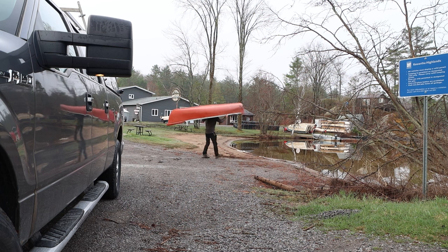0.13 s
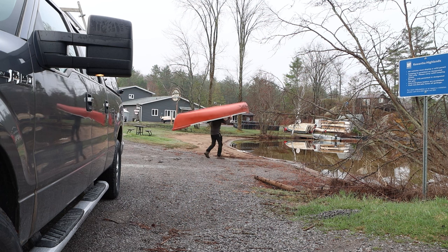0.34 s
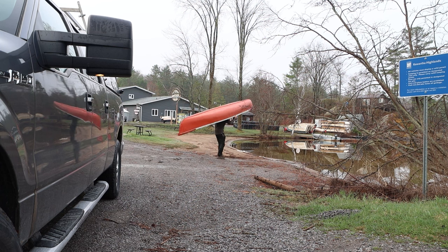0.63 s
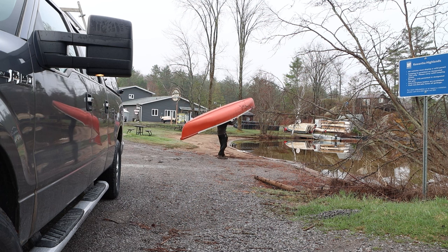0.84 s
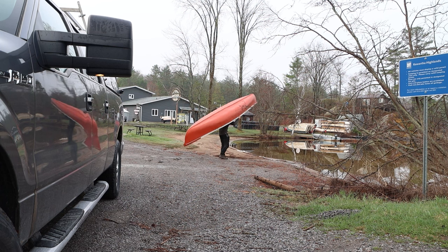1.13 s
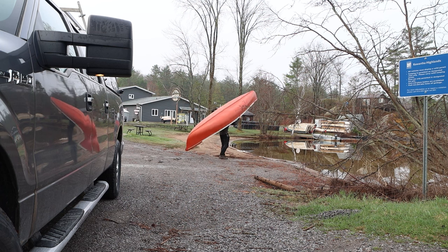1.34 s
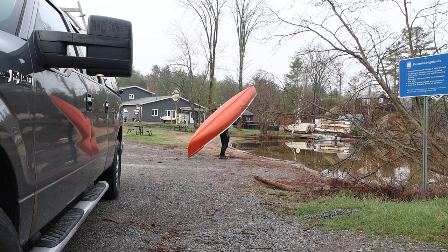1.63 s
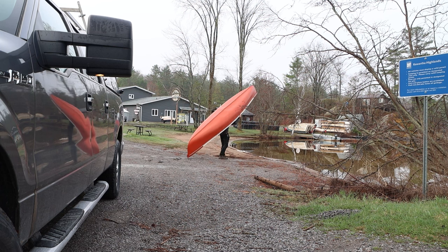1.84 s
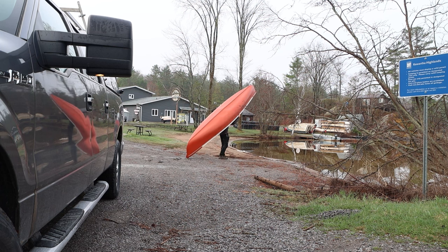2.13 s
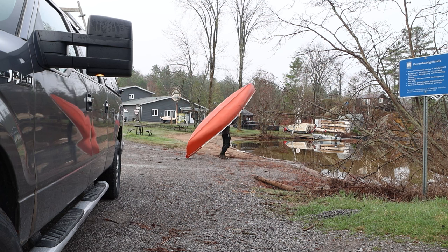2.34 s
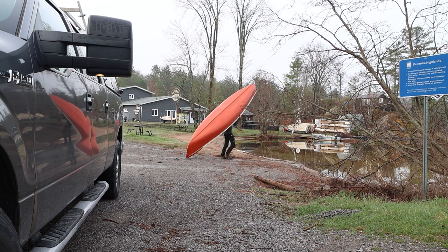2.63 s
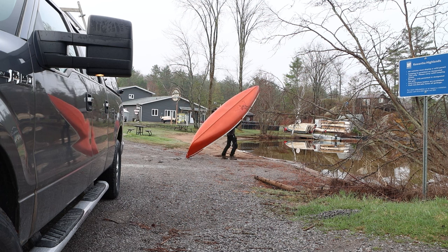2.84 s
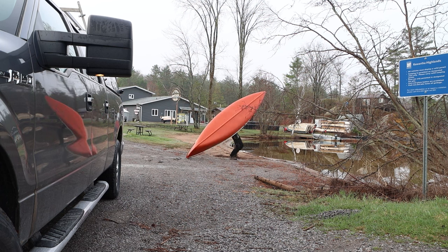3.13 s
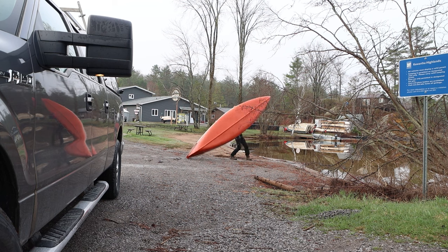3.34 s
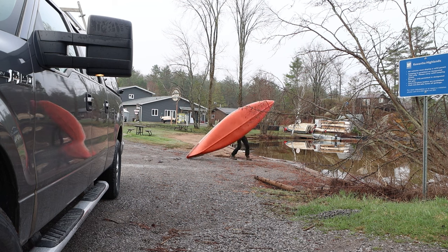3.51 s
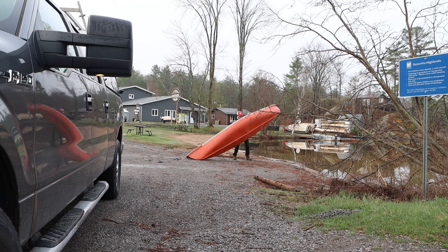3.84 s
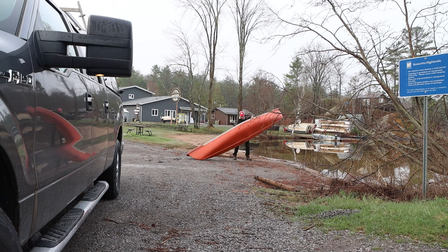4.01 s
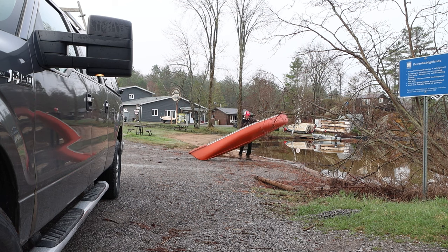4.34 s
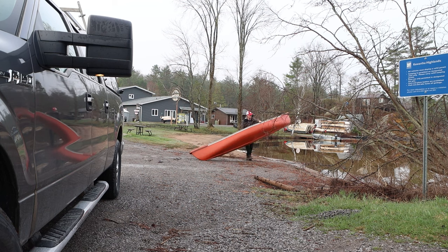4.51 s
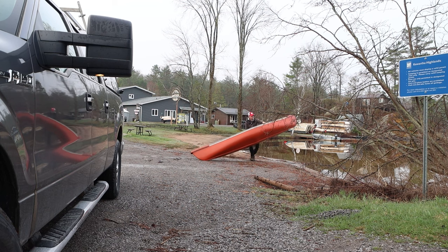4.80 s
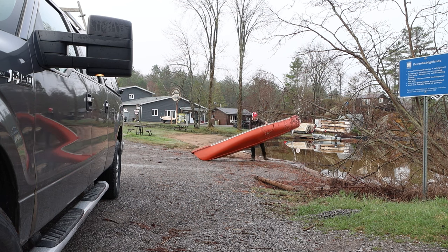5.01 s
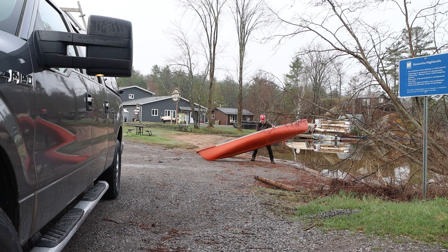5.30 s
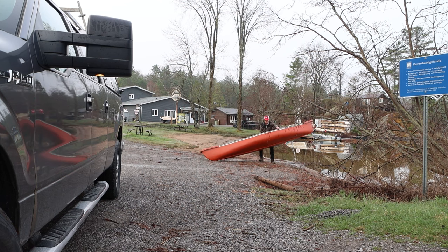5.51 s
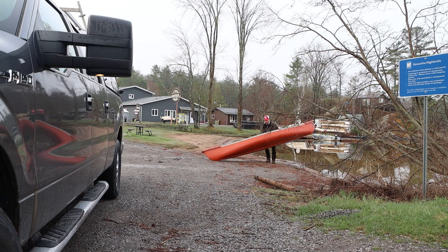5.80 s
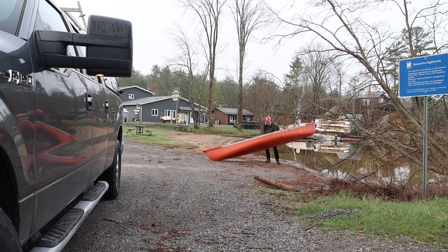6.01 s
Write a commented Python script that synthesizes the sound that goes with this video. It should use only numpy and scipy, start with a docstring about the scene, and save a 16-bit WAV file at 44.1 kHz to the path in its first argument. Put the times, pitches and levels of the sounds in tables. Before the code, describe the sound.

A person carries, tips and drags a hollow plastic canoe over gravel by still water. Footsteps and stiff fabric come first, then clattering low thuds, a bright crack, lighter bumps and steps, another burst of stony clacks, and rasping, droning slides strongest around five and a half seconds. The sound is close and detailed, with low quiet air, a weak dull outdoor echo and barely audible birds.

```python
"""A plastic canoe booms, clacks and scrapes close by as a person carries it over a gravel landing, tips
its stern down, rolls it off the shoulders and slides it toward the lake. Blows ring the modes of the
hollow hull; hard contacts are short noise bursts; scrapes, boots and clothing are shaped streams of
random clicks over hiss. Gliding sines make faint squeaks and far birds. The air is a quiet steady noise.
Ground, trees and the open hull add a weak, dull echo before the microphone path cuts bass and top."""
import sys
import numpy as np
from scipy import signal
from scipy.fft import rfft, irfft
from scipy.io import wavfile
from scipy.ndimage import uniform_filter1d

SR = 44100
rng = np.random.default_rng(int(sys.argv[2]) if len(sys.argv) > 2 else 0)


def store_wav(level_fs):
    """Save 16-bit WAV to argv[1]."""
    pcm = np.round(np.clip(np.atleast_2d(level_fs), -1, 1) * 32767)
    wavfile.write(sys.argv[1], SR, pcm.T.astype(np.int16))


N = 271656
TIME = np.arange(N) / SR  # s

# All levels below are settings ahead of layer trims, filters and echo.
# Sharp chips of a far bird: start_s, length_s, start_hz, end_hz, level_db [s, s, Hz, Hz, dB]
BIRD_CHIPS = [(0.0, 0.019, 4710, 4500, -60.5), (.303, 0.019, 4830, 4520, -56.5),
              (1.32, 0.06, 4230, 4720, -69.5), (5.002, 0.029, 5030, 4600, -58.5)]
# Thin whistles of a far bird: start_s, length_s, start_hz, end_hz, level_db [s, s, Hz, Hz, dB]
BIRD_WHISTLES = [(1.58, 0.053, 3300, 3355, -75), (1.66, 0.076, 2860, 2900, -91),
                 (1.749, 0.056, 4230, 4300, -81)]
# A boot presses into the gravel: start_s, length_s, level_db [s, s, dB]
BOOT_STEPS = [(0.0, 0.016, -72.5), (0.34, 0.16, -58.5), (0.61, 0.047, -65.5), (0.91, 0.088, -60.5),
              (1.15, 0.041, -54), (1.54, 0.017, -69.5), (2.87, 0.067, -51.5), (3.02, 0.062, -53.5),
              (3.32, 0.017, -54.5)]
# Clothing brushes against itself and the hull: start_s, length_s, level_db [s, s, dB]
CLOTH_BRUSHES = [(0.32, .2, -69), (0.89, .11, -80), (1.155, 0.063, -57), (1.28, 0.11, -75),
                 (2.35, 0.041, -67.5), (2.655, 0.059, -60), (2.77, 0.035, -66), (2.86, 0.061, -55.5),
                 (3.03, 0.13, -73), (3.31, 0.037, -65.5), (3.42, 0.032, -53), (3.7, 0.15, -63.5),
                 (4.29, .13, -68.5), (4.435, 0.026, -53.5), (4.7, 0.055, -58), (4.885, 0.015, -60),
                 (5.5, 0.095, -59), (5.69, 0.11, -61)]
# Loudest hard contacts of stones and rim:
# start_s, length_s, clack_db, crack_db, ring_hz [s, s, dB, dB, Hz]
HARD_CONTACTS = [(0.4, 0.0015, -58, -56, 1640), (0.565, 0.0034, -54, -75, 2120),
                 (0.754, 0.0016, -60, -79, 1650), (0.932, .0056, -60.5, -86, 1540),
                 (0.963, 0.0015, -55, -80, 1810), (1.712, 0.006, -70, -94, 1760),
                 (1.795, 0.013, -49, -58, 3500), (1.812, 0.006, -48.5, -59, 2920),
                 (1.827, 0.0052, -50.5, -53, 3270), (1.869, 0.013, -50, -63, 1800),
                 (1.889, 0.0081, -49, -60, 1770), (1.929, 0.013, -50.5, -60, 4400),
                 (1.959, 0.0069, -50, -60, 1720), (1.969, .006, -48, -70, 1040),
                 (1.982, 0.01, -44.5, -54, 1770), (2.238, 0.011, -42, -45, 3430),
                 (2.625, 0.0014, -53.5, -59, 1440), (2.873, 0.0038, -61, -57, 2900),
                 (3.029, .002, -45, -74, 3240), (3.836, 0.0041, -49, -80, 2880),
                 (3.936, 0.0088, -50, -52.5, 2790), (3.945, 0.014, -44.5, -52, 4480),
                 (3.956, 0.016, -46, -50, 3700), (3.976, .006, -47, -69, 1160),
                 (4.044, 0.0076, -53, -61.5, 4320), (4.106, .0013, -43.5, -56, 2080),
                 (4.12, 0.0094, -45.5, -65, 1240), (4.156, 0.0093, -51.5, -80, 2020),
                 (4.188, .0055, -54, -60, 4000), (4.194, 0.0054, -41.5, -54.5, 1250),
                 (4.212, 0.02, -48, -84, 1280), (4.395, 0.015, -49, -57.5, 2390),
                 (4.497, .003, -37, -58, 970), (4.721, 0.0022, -47.5, -55, 1010),
                 (5.321, 0.0016, -43, -51.5, 4230), (5.767, 0.0012, -39, -59, 3400),
                 (5.781, 0.0041, -44.5, -60, 2020), (5.983, 0.0011, -38.5, -77, 2140)]
# Blows that shake the whole hull: start_s, boom_db, knock_db, rebound_db (relative to the blow)
# [s, dB, dB, dB]
HULL_HITS = [(1.802, -41.5, -39.5, -5), (1.88, -39, -55, -4), (1.971, -41, -44, 0), (2.24, -72, -47.5, -10),
             (2.65, -50.5, -44.5, -4), (2.849, -62, -56, -3), (2.965, -50, -44.5, -4.5),
             (3.034, -51, -73, -13), (3.507, -58.5, -77, -7), (3.967, -45.5, -44, 1.5),
             (4.045, -47.5, -59, -6.5), (4.498, -53, -41.5, -3.5), (5.049, -50.5, -51, 5),
             (5.451, -53, -68, -15), (5.57, -52, -61, -6), (5.66, -54, -56, -6)]
# Short shoves of the hull over grit: start_s, length_s, drone_db, rasp_db [s, s, dB, dB]
HULL_SHOVES = [(1.825, 0.2, -51.5, -63), (2.175, 0.024, -61.5, -86), (2.248, 0.027, -50.5, -47.5),
               (2.314, 0.098, -56, -54), (2.662, 0.025, -72, -66), (2.86, .06, -62, -76),
               (3.428, 0.035, -53.5, -53), (3.648, 0.41, -59, -53.5), (4.108, 0.13, -56, -75),
               (4.345, .09, -62, -53.5), (4.72, 0.061, -47.5, -58), (4.888, 0.024, -69, -55.5),
               (5.59, 0.17, -48.5, -70), (5.908, 0.047, -57, -52), (6.083, 0.037, -54, -63)]
# How hard the hull bears on the ground once it is down: time_s, level_db [s, dB]
GROUND_PRESSURE = [(2.03, -69), (2.71, -59.5), (3.03, -58), (3.42, -60.5), (3.7, -53), (3.85, -61),
                   (4.28, -51), (5.0, -52.5), (5.47, -46), (5.62, -46.5), (6.03, -56), (6.16, -57.5)]
# Faint, drawn-out squeaks: start_s, length_s, start_hz, end_hz, level_db [s, s, Hz, Hz, dB]
SQUEAK_NOTES = [(2.02, 0.071, 2420, 2490, -64), (2.11, 0.093, 2450, 2600, -70),
                (2.13, 0.079, 3490, 3480, -73), (2.42, 0.204, 2480, 2530, -70.5),
                (2.44, 0.14, 3620, 3580, -72)]
# Hull flexing as it is handled: time_s, level_db [s, dB]
HULL_FLEX = [(2.03, -61.5), (2.65, -69), (3.64, -71), (4.07, -55), (4.23, -66.5), (5.14, -65),
             (5.25, -62.5), (5.51, -57.5), (6.16, -65.5)]
# One hard slap on the rim: start_s, level_db [s, dB]
RIM_HIT = (2.239, -33.5)
# Long slide of the hull toward the water: time_s, level_db [s, dB]
LONG_SLIDE = [(5.12, -60), (5.18, -53), (5.29, -48), (5.42, -47.5), (5.52, -43.5), (5.61, -47.5),
              (5.72, -54.5), (5.92, -52), (6.0, -63)]

# Modes of the hull, undamped by hands: pitch_hz, level_db, t60_s [Hz, dB, s]
HULL_MODES = [(60.7, -22.5, 0.73), (82.4, -12, 0.37), (108.3, -6, 0.32), (134.2, -8.5, 0.46),
              (157.8, -4, 0.22), (181.8, -1.5, 0.25), (217, 1.5, 0.19), (240, -0.5, 0.19),
              (283.3, -4.5, 0.21), (301.4, -23, 0.33), (354, -14.5, 0.28), (435, -2.5, 0.038),
              (443, -4.5, 0.16), (490, -17, 0.1)]
# Modes of the rim: pitch_hz, level_db, t60_s [Hz, dB, s]
RIM_MODES = [(824, 0, .05), (1421, -16, .09), (2326, -15, .1), (2536, -17, .1), (3182, -9, .08),
             (4113, -17, .09), (6487, -18, .06), (7822, -19, .06), (8699, -20, .07), (10580, -22, .06),
             (12020, -22, .06)]
# Broad panel resonances in the slide: pitch_hz, width_hz (of each of two passes), level_db [Hz, Hz, dB]
PANEL_MODES = [(377, 580, -2), (810, 180, -7.5), (1463, 150, -8), (1950, 640, -5), (3590, 250, -5),
               (4080, 120, -7)]
# Narrow resonances that colour every contact: pitch_hz, width_hz, lift_db [Hz, Hz, dB]
CONTACT_SHEEN = [(1565, 90, 3), (2181, 60, 3), (4572, 90, 4), (5828, 130, 4.5), (6486, 110, 4),
                 (7823, 110, 4), (8695, 120, 4), (9164, 110, 3), (11347, 150, 4), (12017, 160, 4.5),
                 (13418, 160, 5)]

# Spectrum shapes, each with columns pitch_hz, level_db (relative) [Hz, dB]
# Still air of the landing
AIR_COLOUR = [(30, -19), (55, -1), (102, -3.5), (220, -0.5), (300, -7), (420, -9.5), (1000, -13),
              (1720, -12.5), (2490, -9), (2910, -10), (5450, -21.5), (12300, -27), (15500, -47)]
# Gravel under the soles
GRAVEL_COLOUR = [(150, -7), (300, -9.5), (650, -8), (1000, -32.5), (1350, -2), (1650, 1.5), (2100, -1.5),
                 (2400, -19.5), (3000, -1.5), (3700, -5.5), (4400, -16.5), (8000, -20), (16000, -56)]
# Stiff fabric
CLOTH_COLOUR = [(130, -4), (280, 15.5), (650, 8.5), (1050, 5), (1500, -0.5), (2400, 6.5), (3300, 3.5),
                (4200, 1), (4900, 2.5), (6200, 3.5), (9000, 0.5), (12500, -2), (16000, -11)]
# Clacking stones and rim
CLACK_COLOUR = [(300, 1.5), (900, -2), (1800, 2.5), (2800, 3), (3900, 4), (4400, -2.5), (5000, -12),
                (12000, -30.5)]
# Bright crack of a hard contact
CRACK_COLOUR = [(2000, -13), (4300, 9), (6200, 1), (8200, 2.5), (12000, -3), (14500, 0), (16000, -31)]
# Knock of the hull panel
KNOCK_COLOUR = [(80, -24.5), (250, 3.5), (400, 6), (650, -1.5), (980, -2.5), (1300, -8.5), (2500, -24),
                (6000, -32)]
# Drone of the rubbed panels
RUB_COLOUR = [(90, -15.5), (220, -2), (340, 2), (470, -3), (620, -1.5), (760, -9.5), (980, -8),
              (1300, -11.5), (2200, -21.5), (5000, -40)]
# Rasp of grit
RASP_COLOUR = [(600, -11.5), (1200, -1), (1700, 2), (2150, 1.5), (2850, 4), (3300, 4), (3800, 5.5),
               (4300, -6.5), (4900, -10.5), (12000, -22.5)]


def from_db(db):
    """Decibels become an amplitude factor."""
    return 10 ** (np.asarray(db) / 20)


def rms_one(x):
    """Scale a sound to an rms of 1."""
    return x / np.sqrt(np.mean(x ** 2) + 1e-20)


def add(out, start_s, sound):
    """Lay a sound into `out` at its start time."""
    start = max(round(start_s * SR), 0)
    out[start:start + len(sound)] += sound[:N - start]


def level(rows):
    """Gain from a curve of time_s, level_db; it fades quickly outside the curve."""
    time_s, db = np.transpose(rows)
    outside_s = np.maximum(np.maximum(time_s[0] - TIME, TIME - time_s[-1]), 0)
    return from_db(np.interp(TIME, time_s, db)) * np.exp(-outside_s / 0.026)


def strokes(rows, rise_s, swell_db, fade_s):
    """Each stroke builds up to its start, changes by swell_db along its length and dies away."""
    power = np.zeros(N)
    for start_s, length_s, db in rows:
        along = np.clip((TIME - start_s) / length_s, 0, 1)
        outside = np.maximum((start_s - TIME) / rise_s, (TIME - start_s - length_s) / fade_s)
        edge = np.exp(-np.clip(outside, 0, 20))
        power += (from_db(db + swell_db * (along - .5)) * edge) ** 2
    return np.sqrt(power)


def colour(x, spectrum, size=4096):
    """Causal (minimum-phase) filter of the given spectrum that keeps the power of white noise."""
    hz, db = np.transpose(spectrum)
    grid_hz = np.maximum(np.arange(size // 2 + 1) * SR / size, 1)
    skirt_db = -12 * np.maximum(np.log2(hz[0] / grid_hz), 0)  # 12 dB per octave below the first point
    curve_db = np.interp(np.log(grid_hz), np.log(hz), db) + skirt_db
    # folding the cepstrum forward makes the response causal
    cepstrum = irfft(np.log(from_db(curve_db)))
    cepstrum[1:size // 2] *= 2
    cepstrum[size // 2 + 1:] = 0
    response = irfft(np.exp(rfft(cepstrum)))
    return signal.fftconvolve(x, response / np.linalg.norm(response))[:N]


def ring(clicks, hz, t60_s):
    """A unit click sets a decaying sine of height 1 ringing."""
    r = from_db(-60 / (t60_s * SR))
    w = 2 * np.pi * hz / SR
    return signal.lfilter([0, np.sin(w)], [1, -2 * r * np.cos(w), r * r], clicks + 1e-18)


def drift(rate_hz):
    """Straight lines join normal random values drawn `rate_hz` times a second."""
    knots = rng.standard_normal(N)
    return np.interp(TIME * rate_hz, np.arange(N), knots)


def grains(per_s, spread_db, clump_db, clump_rate, hiss):
    """Tiny contacts of uneven size come in clumps over a fine hiss; the slow level is held at 1."""
    sizes = from_db(spread_db * np.minimum(rng.exponential(1, N), 4)) * rng.choice([-1, 1], N)
    contacts = sizes * (rng.random(N) < per_s / SR)
    clicks = rms_one(contacts) + hiss * rng.standard_normal(N)
    clicks = clicks * from_db(clump_db * drift(clump_rate))
    slow_power = uniform_filter1d(uniform_filter1d(clicks ** 2, size=2600), size=1800)
    return clicks / np.sqrt(slow_power + 1e-9)


def crush(length_s, tail_db, tail_s, first=0.19, size=4096):
    """A first hard touch, many tiny slips and a dying rattle; energy is that of rms 1 over the length."""
    t = np.arange(size) / SR
    shape = np.exp(-(t / length_s) ** 2) + from_db(tail_db) * np.exp(-t / tail_s)
    slips = rng.standard_normal(size) * rng.exponential(1, size) ** .5 * shape
    slips /= np.linalg.norm(slips)
    # the shorter the contact, the more the first touch counts
    slips[0] += first * np.sqrt(0.0023 / length_s)
    return slips / np.linalg.norm(slips) * np.sqrt(length_s * SR)


def whistles(notes, waver, waver_rate, octave_db):
    """Gliding tones with a weaker octave above; a fast, deep waver makes them harsh."""
    out = np.zeros(N)
    wobble = 1 + waver * drift(waver_rate)
    for start_s, length_s, start_hz, end_hz, db in notes:
        along = np.clip((TIME - start_s) / length_s, 0, 1)
        pitch_hz = (start_hz + (end_hz - start_hz) * along) * wobble
        phase = 2 * np.pi * np.cumsum(pitch_hz) / SR
        tone = np.sin(phase) + from_db(octave_db) * np.sin(2 * phase)
        out += from_db(db) * np.sin(np.pi * along) * tone
    return out


def sheen(x):
    """Each narrow resonance lifts its own band."""
    lifted = x.copy()
    for hz, width_hz, db in CONTACT_SHEEN:
        b, a = signal.iirpeak(hz, hz / width_hz, fs=SR)
        lifted += (from_db(db) - 1) * signal.lfilter(b, a, x)
    return lifted


def shore(x, echo_db=-19, t60_s=0.25, dull_hz=3500):
    """Ground, trees and the open hull scatter a weak, dull tail of decaying noise."""
    t = TIME[:SR]
    tail = rng.standard_normal(len(t)) * from_db(-60 * t / t60_s) * (1 - np.exp(-t / 0.0021))
    tail = signal.sosfilt(signal.butter(2, dull_hz, fs=SR, output="sos"), tail)
    return x + from_db(echo_db) * signal.fftconvolve(x, tail / np.linalg.norm(tail))[:N]


def still_air(air_db=-73):
    """Steady coloured noise is the quiet air around the landing."""
    return from_db(air_db) * colour(rng.standard_normal(N), AIR_COLOUR)


def birds():
    """Far calls are gliding tones with the echo of the trees."""
    chips = whistles(BIRD_CHIPS, waver=.07, waver_rate=1400, octave_db=-35)
    song = whistles(BIRD_WHISTLES, waver=.012, waver_rate=440, octave_db=-35)
    return shore(chips + song, echo_db=-4, t60_s=.8, dull_hz=7000)


def boots(gravel_db=-2.0, stone_db=-9):
    """Pebbles shift and click under each sole; now and then a larger stone clacks."""
    pebbles = grains(per_s=900, spread_db=2.5, clump_db=5.0, clump_rate=82, hiss=0.45)
    stones = grains(per_s=35, spread_db=7.5, clump_db=-6.0, clump_rate=11, hiss=0.075)
    # the weight comes on, the sole bears down harder, the pebbles settle
    weight = strokes(BOOT_STEPS, rise_s=0.043, swell_db=2, fade_s=0.088)
    crunch = from_db(gravel_db) * colour(pebbles * weight, GRAVEL_COLOUR)
    return crunch + from_db(stone_db) * colour(stones * weight, CLACK_COLOUR)


def clothing(cloth_db=2.0, tick_db=-5, pressure_db=-15.5):
    """Stiff fabric rubs with a fine, bright grain, also while the hull is pressed down; creases tick."""
    threads = grains(per_s=3000, spread_db=2.5, clump_db=4.0, clump_rate=200, hiss=1.0)
    creases = grains(per_s=150, spread_db=-3.5, clump_db=-1.5, clump_rate=37, hiss=0.21)
    brushes = strokes(CLOTH_BRUSHES, rise_s=0.014, swell_db=0, fade_s=0.018)
    motion = np.hypot(brushes, from_db(pressure_db) * level(GROUND_PRESSURE))
    fabric = threads + from_db(tick_db) * creases
    return from_db(cloth_db) * colour(fabric * motion, CLOTH_COLOUR)


def clacks(clack_db=0.0, crack_db=3.0, ring_cycles=10):
    """Stones and rim hit hard: a clack with a short ring of its own, and a bright crack."""
    body, crack = np.zeros(N), np.zeros(N)
    for start_s, length_s, body_db, top_db, hz in HARD_CONTACTS:
        slips = crush(length_s, tail_db=-16, tail_s=.012)
        snap = crush(length_s, tail_db=-18, tail_s=.009)
        rung = ring(slips, hz, ring_cycles / hz)  # falls 60 dB in ring_cycles periods
        rung *= .42 * np.linalg.norm(slips) / np.linalg.norm(rung)
        add(body, start_s, from_db(body_db) * (slips + rung))
        add(crack, start_s, from_db(top_db) * snap)
    clack = from_db(clack_db) * colour(body, CLACK_COLOUR)
    return clack + from_db(crack_db) * colour(crack, CRACK_COLOUR)


def hull_blows(boom_db=0.0, knock_db=2.0, contact_s=0.0082, vary_db=1.0, rebound_s=0.014):
    """Blows and rebounds meet the hull at varied places, ring its modes unevenly and knock its panel."""
    hits = []
    for start_s, boom, knock, rebound_db in HULL_HITS:
        hits.append((start_s, boom, knock))
        # the hull springs back and lands again
        hits.append((start_s + rebound_s, boom + rebound_db, knock + rebound_db))
    shape = (len(hits), len(HULL_MODES))
    place = from_db(vary_db * rng.standard_normal(shape)) * rng.choice([-1, 1], shape)
    booms, knocks = np.zeros(N), np.zeros(N)
    for k, (hz, mode_db, t60_s) in enumerate(HULL_MODES):
        pushes = np.zeros(N)
        for (start_s, db, _), strength in zip(hits, place[:, k]):
            add(pushes, start_s, [strength * from_db(db + mode_db)])
        booms += ring(pushes, hz, t60_s)
    for start_s, _, db in hits:
        add(knocks, start_s, from_db(db) * crush(contact_s, tail_db=-11, tail_s=0.017))
    return from_db(boom_db) * booms + from_db(knock_db) * colour(knocks, KNOCK_COLOUR)


def shove_force(rows):
    """A shove loses a little force as it goes."""
    return strokes(rows, rise_s=0.012, swell_db=-0.5, fade_s=0.014)


def sliding(rub_db=-1.0, rasp_db=-1.5, stone_db=-12, pressure_rub_db=-6.5, pressure_rasp_db=-8):
    """Grit catches and slips under the hull: panels drone and grit rasps; small stones tick."""
    slips = grains(per_s=1500, spread_db=3.0, clump_db=1.0, clump_rate=13, hiss=0.49)
    grit = grains(per_s=1800, spread_db=1.5, clump_db=4.0, clump_rate=63, hiss=0.82)
    stones = grains(per_s=60, spread_db=1.5, clump_db=11.0, clump_rate=27, hiss=.1)
    drone = shove_force([(start_s, length_s, db) for start_s, length_s, db, _ in HULL_SHOVES])
    scrape = shove_force([(start_s, length_s, db) for start_s, length_s, _, db in HULL_SHOVES])
    # steady drone and rasp follow the pressure; the shoves add to them
    pressure = level(GROUND_PRESSURE)
    rub = colour(slips * np.hypot(drone, from_db(pressure_rub_db) * pressure), RUB_COLOUR)
    rasp = colour(grit * np.hypot(scrape, from_db(pressure_rasp_db) * pressure), RASP_COLOUR)
    ticks = colour(stones * pressure, CLACK_COLOUR)
    return from_db(rub_db) * rub + from_db(rasp_db) * rasp + from_db(stone_db) * ticks


def squeaks():
    """Faint, drawn-out squeaks are wavering tones with a clear octave above."""
    return whistles(SQUEAK_NOTES, waver=.014, waver_rate=460, octave_db=-11)


def flexing(flex_db=3, hand_damping=0.33):
    """Handling keeps the hull's modes rumbling, their decay shortened by hands and shoulders."""
    nudges = grains(per_s=450, spread_db=7.0, clump_db=-1.0, clump_rate=29, hiss=0.12)
    rumble = np.zeros(N)
    for k, (hz, db, t60_s) in enumerate(HULL_MODES):
        strength = (-1) ** k * from_db(db) * (hz / 200) ** -.45  # lower modes count more
        rumble += strength * ring(nudges, hz, t60_s * hand_damping)
    return from_db(flex_db) * rms_one(rumble) * level(HULL_FLEX)


def rim():
    """The slap sets all the modes of the rim ringing, with alternating signs."""
    start_s, db = RIM_HIT
    push = np.zeros(N)
    add(push, start_s, [from_db(db)])
    return sum((-1) ** k * from_db(mode_db) * ring(push, hz, t60_s)
               for k, (hz, mode_db, t60_s) in enumerate(RIM_MODES))


def dragging(drag_db=0.0, shift_db=1.4, shift_rate=22):
    """Uneven stick and slip drives steep-sided panel resonances that come and go as contact shifts."""
    slips = grains(per_s=700, spread_db=3.0, clump_db=2.0, clump_rate=45, hiss=.3)
    sung = np.zeros(N)
    for hz, width_hz, db in PANEL_MODES:
        b, a = signal.iirpeak(hz, hz / width_hz, fs=SR)
        panel = signal.lfilter(b, a, signal.lfilter(b, a, slips))  # two passes steepen the sides
        sung += from_db(db + shift_db * drift(shift_rate)) * panel
    return from_db(drag_db) * rms_one(sung) * level(LONG_SLIDE)


def scene():
    """Contacts share the sheen and the landing's echo; birds bring their own echo, the air has none."""
    canoe = clacks() + hull_blows() + sliding() + flexing() + rim() + dragging()
    contacts = sheen(canoe + boots() + clothing())
    landing = shore(contacts + squeaks())
    return (landing + birds() + still_air())[None]


def record(dry):
    """The microphone path cuts the deepest bass and the top."""
    bass_cut = signal.butter(4, 52, "high", fs=SR, output="sos")  # Hz
    top_cut = signal.ellip(10, .1, 80, 16000, fs=SR, output="sos")  # ripple dB, stop dB, Hz
    return signal.sosfilt(top_cut, signal.sosfilt(bass_cut, dry))


dry = scene()
out = record(dry)
store_wav(out)
```